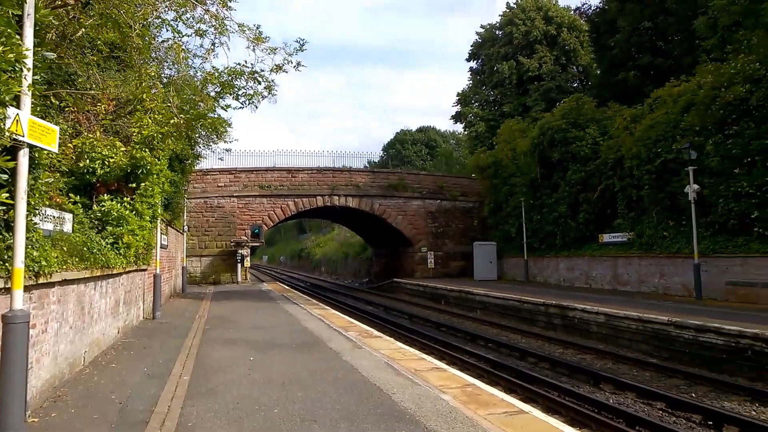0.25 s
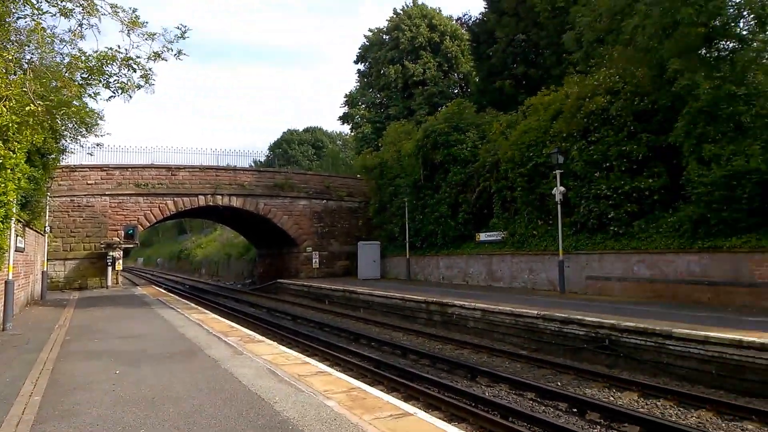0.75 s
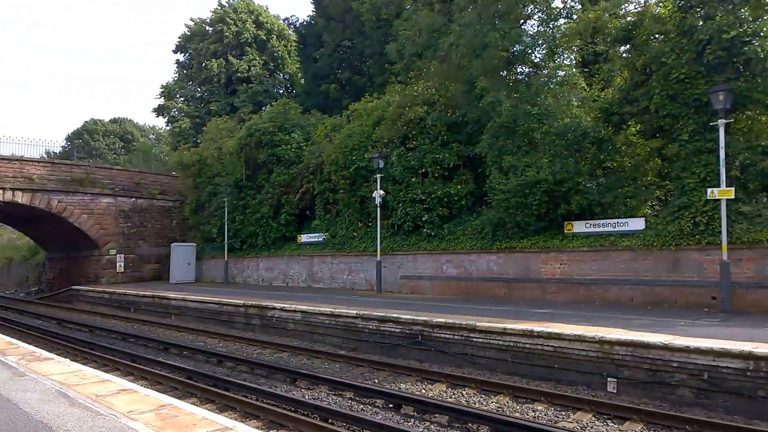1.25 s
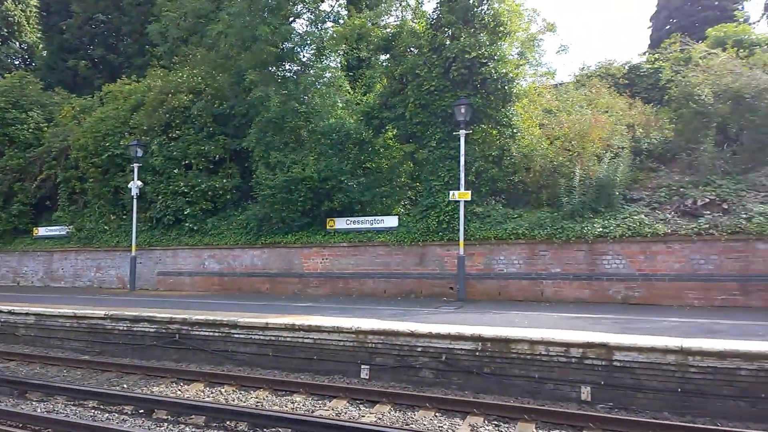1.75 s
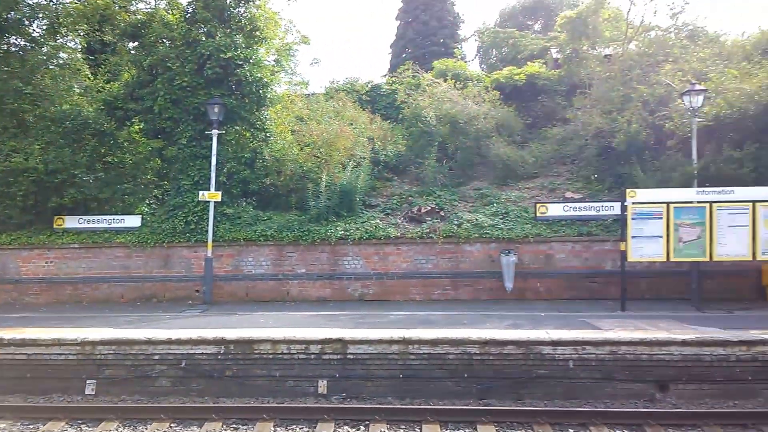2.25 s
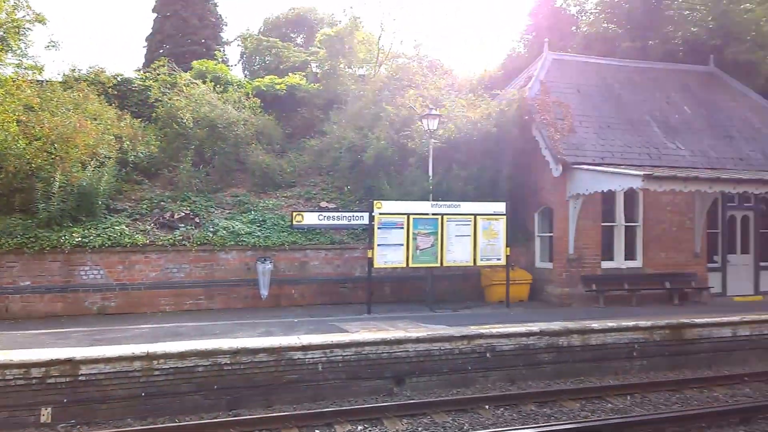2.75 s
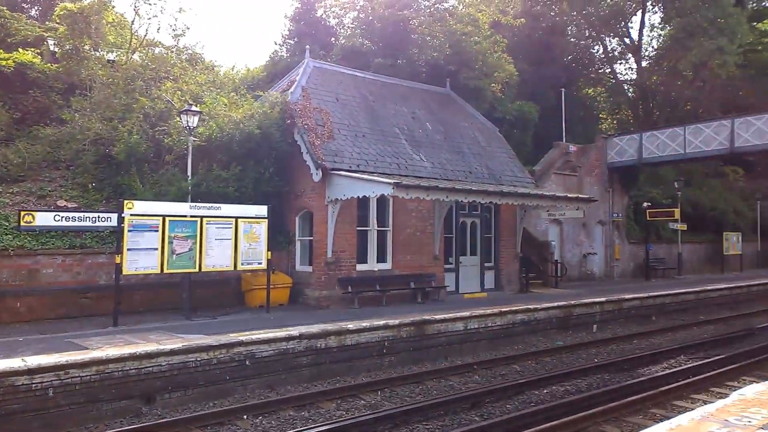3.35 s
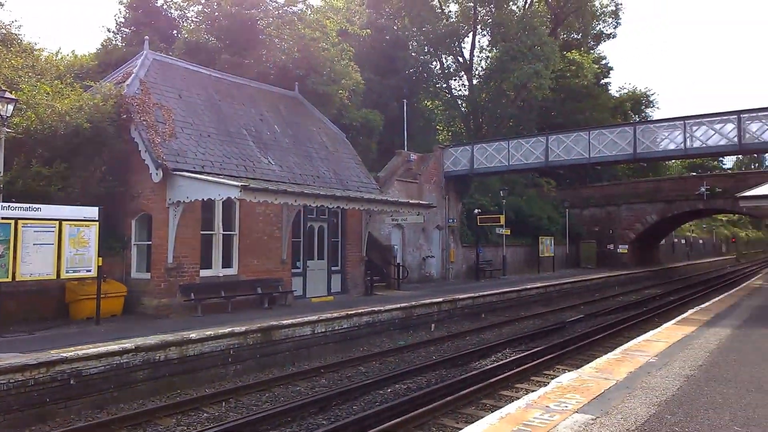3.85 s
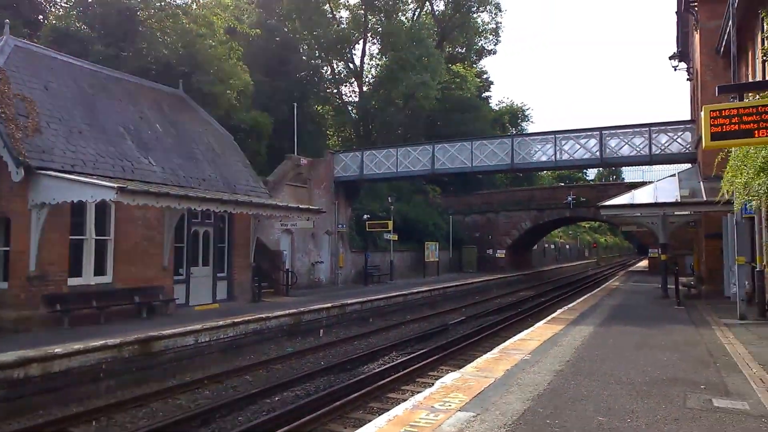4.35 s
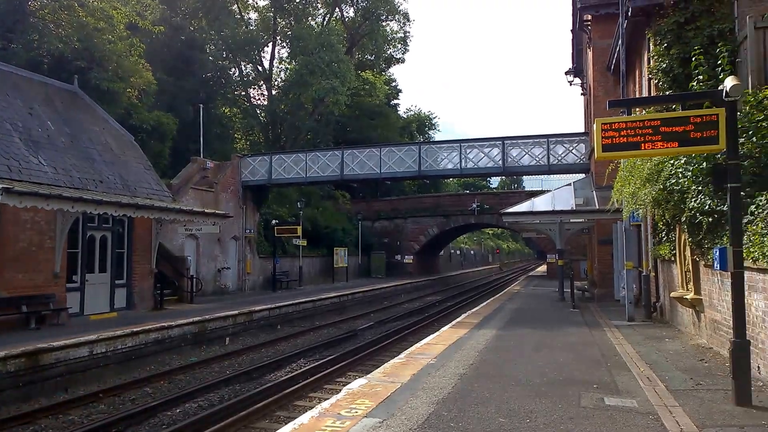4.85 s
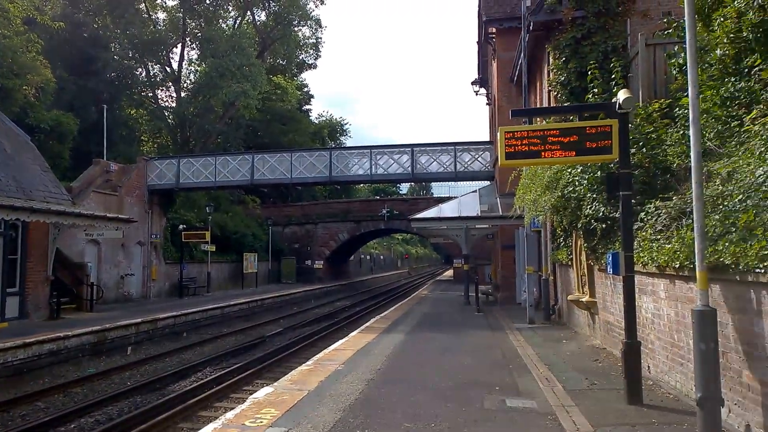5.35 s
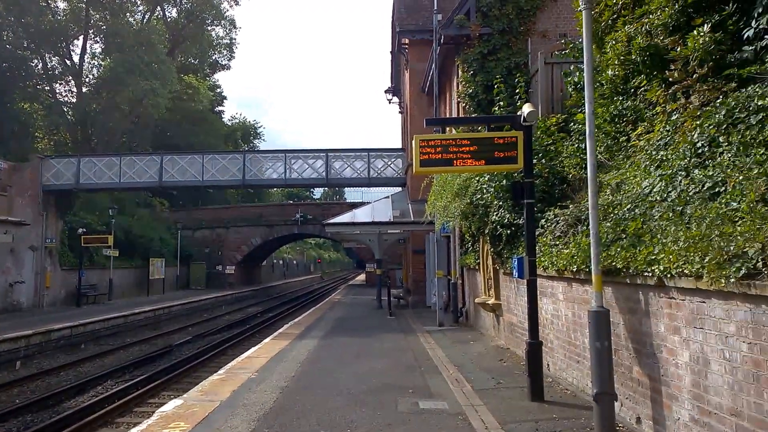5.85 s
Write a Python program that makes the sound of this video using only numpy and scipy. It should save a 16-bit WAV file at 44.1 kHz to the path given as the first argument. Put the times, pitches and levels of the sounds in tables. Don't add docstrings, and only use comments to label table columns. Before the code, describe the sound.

Outdoors on a quiet railway platform between brick walls and trees, low wind gusts and far traffic come first. A wood pigeon then coos five hoarse notes, pauses briefly, and coos three more, lightly echoed. A small bird gives a faint high seep and rasps early, then a clearer seep at the end. The hand-held stereo device creaks and ticks.

```python
import sys
import numpy as np
from scipy import signal
from scipy.fft import rfft, irfft, next_fast_len
from scipy.io import wavfile
from scipy.ndimage import uniform_filter1d

SR = 44100
rng = np.random.default_rng(int(sys.argv[2]) if len(sys.argv) > 2 else 0)


def generate_wav(sig):
    pcm = np.round(np.clip(np.atleast_2d(sig).T, -1, 1) * 32767).astype(np.int16)
    wavfile.write(sys.argv[1], SR, pcm)


def invert_db(x):
    u = np.asarray(x, float) / 20
    return 10 ** u


N = 269010
T = np.arange(N) / SR
HZ = np.arange(N // 2 + 1) * SR / N + 1e-3

# time in seconds, pitch in Hz, level in dB.
PHRASE_ONE = [
    [(1.59, 376.4, -49.5), (1.666, 486.2, -44.5), (1.698, 531.3, -36), (1.758, 585, -37.5),
     (1.906, 627, -35), (2.004, 608, -36.5), (2.132, 512.8, -35), (2.15, 517.2, -56)],
    [(2.322, 349, -49), (2.348, 552.8, -43.5), (2.39, 636.2, -37), (2.45, 628, -36), (2.496, 568.5, -41),
     (2.575, 519.8, -29), (2.604, 489.4, -44), (2.69, 355, -45)],
    [(2.99, 383, -60.5), (3.024, 536, -34), (3.115, 532, -31), (3.158, 525, -31.5), (3.19, 504.2, -32),
     (3.218, 495.9, -40.5), (3.27, 434, -47), (3.32, 404.8, -47.5)],
    [(3.33, 399, -47.5), (3.405, 498.6, -36.5), (3.486, 493, -45), (3.508, 452.7, -37), (3.634, 377.8, -45),
     (3.66, 390.5, -46.5)],
    [(3.815, 386.3, -56.5), (3.87, 438.7, -53), (3.89, 521.3, -31.5), (3.936, 530.1, -31),
     (4.038, 562.5, -40.5), (4.078, 552.3, -39), (4.1, 566.4, -67.5)],
]
# time in seconds, pitch in Hz, level in dB.
PHRASE_TWO = [
    [(4.36, 405, -47), (4.4, 527.6, -30.5), (4.498, 564.9, -41), (4.59, 579.4, -47), (4.79, 552.5, -42),
     (4.9, 526.7, -34.5), (4.942, 486.3, -35), (4.97, 470.5, -58.5)],
    [(5.14, 430.5, -74), (5.172, 510.8, -35), (5.205, 638.7, -41), (5.245, 677.7, -43), (5.314, 569, -41),
     (5.378, 508.8, -35), (5.466, 487.2, -39.5), (5.55, 400.6, -42), (5.6, 383, -55.5)],
    [(5.85, 370.8, -59.5), (5.886, 525, -33.5), (5.916, 520.6, -31.5), (6.02, 471.2, -37.5),
     (6.1, 461.6, -42)],
]
NOTE_HOARSE_SHARE = [.95, .85, .9, .9, .4, 1.0, 1.0, .9]
# time in seconds, depth in dB.
CATCHES = [(1.739, 22), (1.752, 10), (1.795, 14), (1.85, 8), (1.95, 8), (1.995, 7), (2.03, 8), (2.53, 8),
           (2.55, 8), (1.905, 8), (2.352, 8), (2.645, 10), (3.093, 16), (3.148, 18), (3.172, 14),
           (3.218, 14), (3.388, 8), (3.422, 14), (3.49, 12), (3.515, 10), (3.54, 10), (4.0, 10), (4.06, 24),
           (4.412, 8), (4.43, 12), (4.385, 12), (4.648, 20), (4.711, 20), (4.75, 18), (4.82, 14), (5.19, 8),
           (4.798, 18), (4.863, 16), (5.312, 18), (5.358, 20), (5.405, 10), (5.5, 10), (6.01, 18),
           (6.035, 10)]
# time in seconds, pitch in Hz, level in dB.
SEEPS = [
    [(1.48, 5240, -89), (1.494, 5240, -82), (1.554, 5240, -71), (1.618, 5240, -70), (1.64, 5240, -72)],
    [(6.0, 5240, -85), (6.018, 5240, -76), (6.074, 5240, -62), (6.1, 5240, -60)],
]
# time in seconds, pitch in Hz, level in dB.
RASPS = [
    [(1.5, 5500, -79), (1.54, 5590, -69), (1.56, 5330, -78), (1.6, 4980, -66.5), (1.64, 4960, -65),
     (1.67, 5050, -69), (1.685, 5030, -73.5), (1.74, 5130, -79)],
    [(2.07, 5750, -80), (2.1, 5600, -76), (2.14, 5300, -79)],
]
# delay in seconds, level in dB, left minus right in dB.
ECHOES = [(.012, -16, 2), (.045, -18, -2), (.083, -21, 1), (.097, -22, -1), (.108, -25, 1)]
# frequency in Hz, density in dB per Hz.
GUST_SPECTRUM = [(7.1, -32), (12, -2), (38, 0), (56, -4), (91, -13), (110, -14), (140, -44), (240, -120)]
# time in seconds, peak in dB, half length in seconds.
GUSTS = [(.07, -43.5, 0.051), (.22, -41, 0.055), (.38, -39, 0.028), (.54, -50, 0.031), (.73, -44.5, 0.035),
         (1.1, -45, 0.27), (1.93, -46.5, 0.085), (2.23, -47, 0.048), (2.53, -42.5, 0.038), (2.74, -42, .04),
         (2.92, -44, 0.027), (3.2, -49.5, 0.2), (3.41, -50, 0.034), (3.65, -43.5, 0.097),
         (3.76, -36, 0.023), (4.0, -47.5, 0.18), (4.2, -57, 0.056), (4.32, -41, 0.14), (4.55, -47, 0.039),
         (5.06, -42.5, 0.032), (5.27, -45, 0.082), (5.5, -44, 0.016), (5.72, -50, 0.067)]
# time in seconds, peak in dB, ring in Hz, T60 in seconds.
TAPS = [(.414, -47.5, 398, 0.025), (.416, -48.5, 620, 0.022), (.4175, -48.5, 830, 0.018),
        (.417, -56.5, 2060, 0.011), (1.854, -45, 1110, 0.02), (2.381, -50.5, 1160, 0.039),
        (2.395, -33.5, 900, 0.0063), (4.16, -50.5, 1066, 0.05), (3.609, -55.5, 1096, .03),
        (4.267, -61.5, 2220, .01), (4.2765, -40.5, 2290, 0.024), (4.2762, -44.5, 1240, 0.026),
        (4.286, -38, 1980, 0.011), (4.293, -46.5, 2080, 0.022), (4.3, -44, 1870, 0.013),
        (4.691, -44.5, 1100, 0.021)]
# time in seconds, peak in dB, ring in Hz, T60 in seconds.
SNAPS = [(3.8048, -52, 5700, .005), (3.8048, -59, 3300, .005), (3.805, -57, 11500, .005),
         (3.8048, -60, 14600, .005), (3.805, -62, 7600, .004), (3.813, -64, 6500, .008),
         (3.813, -72, 12000, .01), (6.097, -62, 8000, .004), (6.097, -64, 12500, .004)]
# time in seconds, peak in dB, centre in Hz.
TICKS = [
    (.4165, -66, 1600),
    (.4165, -41.5, 2880),
    (4.925, -78, 9000),
    (6.098, -61, 8040),
    (6.098, -62, 2490),
]
# frequency in Hz, density in dB per Hz.
LEAVES_BEHIND = [(530, -33), (900, -4), (1060, -13.5), (1100, -11), (1160, -2), (1350, -15.5),
                 (1550, -12.5), (1990, -15), (2280, -3), (2640, -8.5), (2910, -1), (3330, -15), (4200, -28),
                 (5460, -53.5), (9240, -120)]
# frequency in Hz, density in dB per Hz.
LEAVES_AHEAD = [(530, -26.5), (900, -11), (924, -18), (1020, -20.5), (1100, -10), (1220, -13), (1540, -25),
                (1940, -19), (2340, -20.5), (2830, -19), (3140, -18), (3940, -41), (4200, -37.5),
                (5460, -63), (9240, -120)]
# frequency in Hz, density in dB per Hz.
RUSTLE_SPECTRUM = [(2120, -33), (3600, 0.5), (4050, -5.5), (4810, -1.5), (5710, -0.5), (6120, 0.5),
                   (6710, -6), (7540, -11), (11400, -13.5), (15000, -13), (15700, -18.5)]
# time in seconds, peak in dB over calm, half length in seconds.
BREEZE = [(.01, -7, 0.012), (.6, -8, 0.074), (.84, -2.5, 0.061), (1.2, -1.5, 0.055), (1.41, 3, .03),
          (1.73, -0.5, 0.025), (1.95, -15.5, 0.12), (2.24, -5, 0.047), (4.1, -3.5, 0.28), (4.65, -6, 0.3),
          (4.93, -1, 0.035), (5.3, -2, 0.21), (6.1, -3, 0.049)]
# time in seconds, facing of the open side 0-1.
TURN = [
    (.36, 0.96),
    (.44, 0),
    (2.22, 0),
    (2.62, 1),
]
# frequency in Hz, density in dB per Hz.
ROAD_SPECTRUM = [(100, -31), (170, -3.5), (194, -12), (243, -0.5), (317, -4.5), (356, -10), (505, -13.5),
                 (579, -18.5), (654, -20), (800, -20), (1040, -63.5), (1760, -120)]
# time in seconds, peak in dB, half length in seconds.
SWELLS = [(.22, -58, 0.071), (.6, -67, 0.064), (4.15, -58, 0.069), (6.05, -60.5, 0.11), (.9, -54.5, 0.16),
          (1.26, -50.5, 0.058), (1.88, -59, 0.28), (2.55, -55, 0.063), (3.4, -54, 0.32),
          (3.91, -54.5, 0.18), (4.55, -61, 0.15), (5.25, -57, 0.19)]
# frequency in Hz, density in dB per Hz.
DRONE_SPECTRUM = [(50, -38), (85, -17.5), (102, -6.5), (161, 1.5), (178, -3), (199, -14.5), (210, -8.5),
                  (270, -42), (460, -120)]
# time in seconds, peak in dB, half length in seconds.
REVS = [(.28, -53, 0.12), (.7, -60, 0.19), (.99, -57.5, 0.085), (1.28, -53, 0.026), (1.43, -51.5, 0.036),
        (1.9, -53.5, 0.18), (2.55, -57, .06), (2.9, -55.5, 0.066), (3.4, -50.5, 0.2), (3.82, -56.5, 0.074),
        (4.1, -52, .1), (4.55, -55, 0.14), (4.98, -56, 0.18), (5.3, -62.5, 0.09)]
# time in seconds, peak in dB, half length in seconds.
WHINE_SWELLS = [(.2, -65, 0.099), (1.33, -71, 0.098), (1.95, -64.5, 0.16), (2.4, -59, 0.031),
                (2.62, -61.5, 0.099), (2.74, -53.5, 0.03), (2.86, -55, 0.023), (3.05, -52.5, 0.13),
                (3.3, -52.5, 0.046), (3.39, -50, 0.075), (3.6, -53, 0.021), (3.7, -55.5, 0.019),
                (3.86, -52, 0.064), (4.03, -49.5, 0.039), (4.16, -51, 0.053), (4.6, -56.5, .28),
                (5.02, -57.5, 0.032), (5.23, -49, 0.052), (5.41, -60, 0.074), (5.72, -66, 0.026),
                (5.96, -61, 0.056)]
# frequency in Hz, left lead in radians.
PORT_PHASE = [(0, -1), (690, 0.76), (1550, 2.5), (2070, 3), (2410, 3.5), (2840, 1.5), (3100, 4.5),
              (4310, 1), (4650, 4.5), (6200, 8.5), (6460, 8.5), (9730, 8.5), (14900, 15), (15900, 7)]
# frequency in Hz, left minus right in dB.
PORT_BALANCE = [(60, 1), (110, 4), (200, 0), (380, 3.5), (700, -3), (1290, -7.5), (2380, -5.5),
                (4400, -4.5), (8120, 0), (15000, 1)]


def pigeon():
    catch_s, waver_rad, waver_rate_hz = .005, .5, 60
    crop_hz, crop_width_hz = 456, 340
    hollow_hz, hollow_width_hz, hollow_db = 520.4, 64, -4.5
    notes = PHRASE_ONE + PHRASE_TWO
    size, turn = whistle(notes, 0.013)
    catch_db = sum(db * np.exp(-.5 * ((T - s) / catch_s) ** 2) for s, db in CATCHES)
    size = size * invert_db(-catch_db)
    hoarse = hoarseness(notes)
    turn = turn * np.exp(1j * waver_rad * hoarse * walk(waver_rate_hz))

    flutter = .4 * shake(150) + .9 * shake(380)
    raw = np.real(size * hoarse * flutter * turn)
    crop = signal.iirpeak(crop_hz, crop_hz / crop_width_hz, SR)
    hollow = signal.iirpeak(hollow_hz, hollow_hz / hollow_width_hz, SR)
    in_crop = signal.lfilter(*crop, signal.lfilter(*crop, raw))
    in_gullet = invert_db(hollow_db) * signal.lfilter(*hollow, raw)
    halo = .04 * raw + 1.02 * in_crop + in_gullet

    clear = size * np.sqrt(1 - hoarse ** 2) * turn
    octave = invert_db(-33.5) * size * shake(500) * turn ** 2
    return np.real(clear + octave) + halo


def hoarseness(notes):
    note = np.maximum(np.searchsorted([n[0][0] for n in notes], T) - 1, 0)
    level_db = curves(np.vstack(notes))[1]
    effort = np.interp(level_db, (-45, -32.5), (.9, .16))
    share = uniform_filter1d(np.array(NOTE_HOARSE_SHARE)[note], SR // 50)
    return np.minimum(effort * share, .95)


def small_bird():
    buzz_hz = 536
    size, turn = whistle(SEEPS, .02)
    buzz = np.exp(2j * np.pi * buzz_hz * T)
    line = .65 + .55 * shake(250)
    haze = .65 * shake(1300) * buzz + .2 * shake(500) * buzz ** 2
    seep = size * turn * (line + haze)
    size, turn = whistle(RASPS, .02)
    rasp = size * turn * shake(1100)
    return np.real(seep + rasp)


def cutting(x):
    t60_s, tail_db = .6, -11.5
    t = T[:SR]
    tail = rng.standard_normal((2, SR)) * invert_db(-60 * t / t60_s) * (t > .02)
    response = invert_db(tail_db) * tail / np.sqrt(np.sum(tail ** 2) / 2)
    for delay_s, db, pan_db in ECHOES:
        response[:, int(delay_s * SR)] += invert_db(db + np.array([pan_db, -pan_db]) / 2)
    smeared = np.real(signal.hilbert(x) * (.6 + .7 * shake(90)))
    return signal.fftconvolve(smeared[None], response, axes=1)[:, :N]


def port_wind():
    lull_db = -53.5
    wind_db = bumps(GUSTS, lull_db)
    gust_pan_db = np.interp(T, (0.15, 0.69), (10, 1.5))
    pan_db = gust_pan_db + 2.5 * invert_db(lull_db - wind_db)
    return bed(GUST_SPECTRUM, 0.87, 1.2, 29) * invert_db(wind_db + np.array([pan_db, -pan_db]) / 2)


def handling(rows):
    out, t = np.zeros(N + SR), T[:SR // 8]
    for s, db, hz, t60_s in rows:
        start = int(s * SR)
        out[start:start + len(t)] += invert_db(db - 60 * t / t60_s) * np.sin(2 * np.pi * hz * t)
    return out[:N]


def leaf_hiss():
    leaves_db, rustle_db, rustle_follow = -65, -74.5, 0.61
    stir_db = bumps(BREEZE, 0)
    turned_rad = np.clip(curves(TURN)[0], 0, 1) * np.pi / 2
    behind = bed(LEAVES_BEHIND, 0.45, 1.3, 6)
    ahead = bed(LEAVES_AHEAD, 0.45, 1.3, 6)
    leaves = np.cos(turned_rad) * behind + np.sin(turned_rad) * ahead
    rustle = bed(RUSTLE_SPECTRUM, 0.054, 1.0, 3.8)
    return leaves * invert_db(leaves_db + stir_db) + rustle * invert_db(rustle_db + rustle_follow * stir_db)


def far_traffic():
    road_floor_db, drone_floor_db, drone_walk_db = -63, -59, 0.55
    hush_s, hush_half_s, hush_db = 5.76, .12, -5
    hush = hush_db * np.exp(-((T - hush_s) / hush_half_s) ** 2)
    road_db = bumps(SWELLS, road_floor_db) + 0.5 + hush
    drone_db = bumps(REVS, drone_floor_db) + drone_walk_db * walk(9)
    road = bed(ROAD_SPECTRUM, 0.91, 0.89, 9.2)
    drone = bed(DRONE_SPECTRUM, 1.0, 0.51, 3.7)
    return road * invert_db(road_db) + drone * invert_db(drone_db)


def machine_whine():
    whine_hz, faint_db, fade_db = 861.5, -78, .8
    db = bumps(WHINE_SWELLS, faint_db) + fade_db * walk(14)
    air = .8 + .35 * shake(30) + .35 * shake(110)
    return np.real(invert_db(db) * air * np.exp(2j * np.pi * whine_hz * T))


def ports(x):
    size = next_fast_len(N + SR // 10)
    heard_hz = np.arange(size // 2 + 1) * SR / size + 1e-3
    lead_rad = np.interp(heard_hz, *np.transpose(PORT_PHASE))
    hz, db = np.transpose(PORT_BALANCE)
    balance_db = np.interp(np.log(heard_hz), np.log(hz), db)
    half = invert_db(balance_db / 2) * np.exp(.5j * lead_rad)
    padded = np.pad(x, ((0, 0), (0, size - N)), "linear_ramp")
    return irfft(rfft(padded) * np.array([half, 1 / half]), size)[:, :N]


def whistle(notes, edge_s):
    hz, db = curves(np.vstack(notes))
    gate = sum((T >= n[0][0]) & (T <= n[-1][0]) for n in notes)
    gate = uniform_filter1d(1. * gate, int(edge_s * SR))
    return np.sqrt(2) * invert_db(db) * gate, np.exp(2j * np.pi * np.cumsum(hz) / SR)


def bed(spectrum, alike, flicker_db, rate_hz):
    hz, db = np.transpose(spectrum)
    colour = invert_db(np.interp(np.log(HZ), np.log(hz), db, -120, -120))
    share = np.clip(alike, 0, 1)
    noise = rng.standard_normal((3, N))
    both = rfft(np.sqrt(share) * noise[0] + np.sqrt(1 - share) * noise[1:]) * colour
    out = 0
    for centre in np.arange(np.log2(hz[0]), np.log2(hz[-1]) + 1):
        part = np.clip(1 - np.abs(np.log2(HZ) - centre), 0, 1)
        out = out + invert_db(flicker_db * walk(rate_hz)) * irfft(both * part, N)
    return unit(out)


def bumps(rows, floor_db):
    power = sum(invert_db(2 * db) * np.exp(-((T - s) / half_s) ** 2) for s, db, half_s in rows)
    return 10 * np.log10(power + invert_db(2 * floor_db))


def shake(rate_hz):
    return (walk(rate_hz) + 1j * walk(rate_hz)) / np.sqrt(2)


def walk(rate_hz):
    k = int(SR / rate_hz)
    held = np.repeat(rng.standard_normal(N // k + 1), k)
    return unit(uniform_filter1d(uniform_filter1d(held, k), k)[:N])


def curves(table):
    s, *columns = np.transpose(table)
    return [np.interp(T, s, c) for c in columns]


def unit(x):
    return x / np.sqrt(np.mean(np.abs(x) ** 2))


def scene():
    coos, seeps = pigeon(), small_bird()
    birds = coos + seeps + cutting(coos + seeps / 2)
    ticks = [(s, db, hz, 7 / hz) for s, db, hz in TICKS]
    knocks = handling(TAPS + ticks)
    outside = birds + knocks + leaf_hiss() + far_traffic() + machine_whine()
    return ports(outside) + port_wind() + handling(SNAPS)


def low_pass(x):
    return signal.sosfilt(signal.butter(12, 16380, fs=SR, output="sos"), x)


def record(dry):
    return low_pass(dry)


dry = scene()
out = record(dry)
generate_wav(out)
```